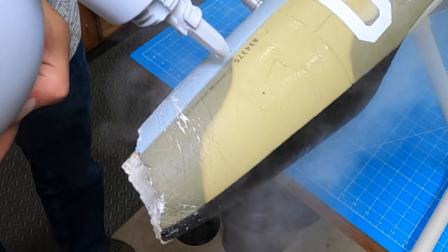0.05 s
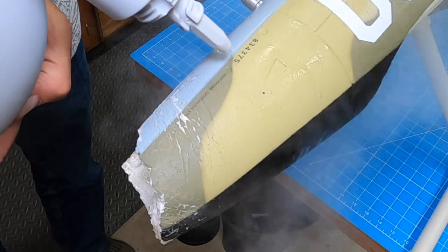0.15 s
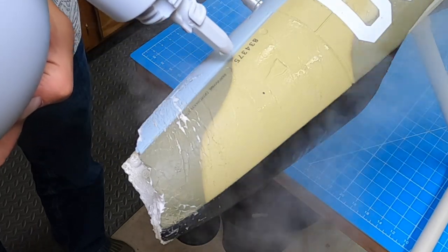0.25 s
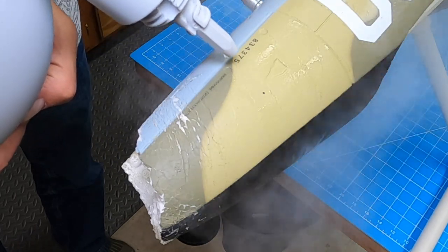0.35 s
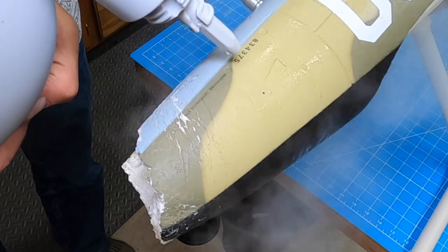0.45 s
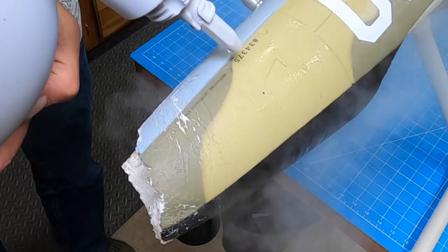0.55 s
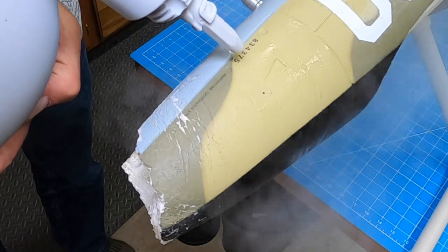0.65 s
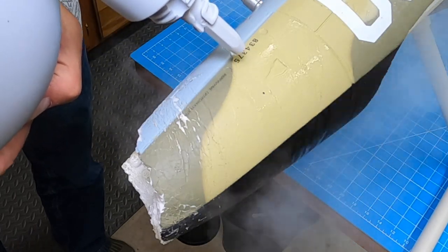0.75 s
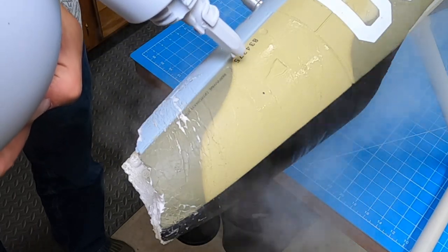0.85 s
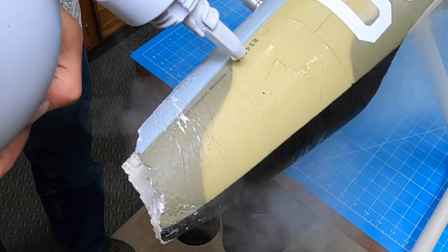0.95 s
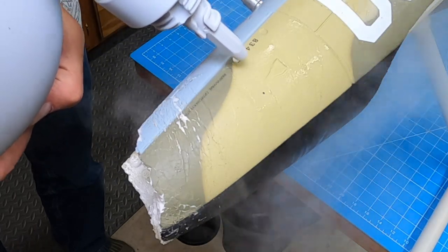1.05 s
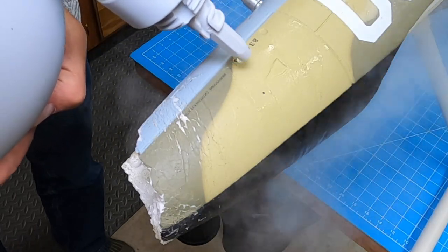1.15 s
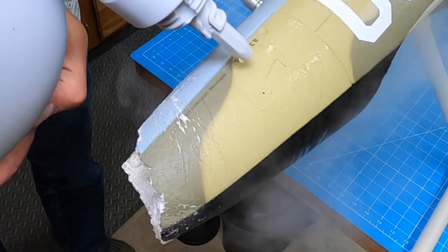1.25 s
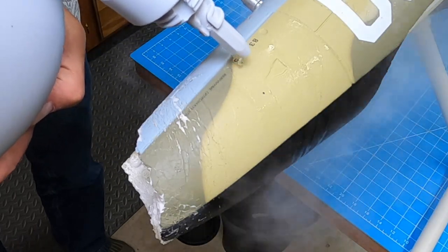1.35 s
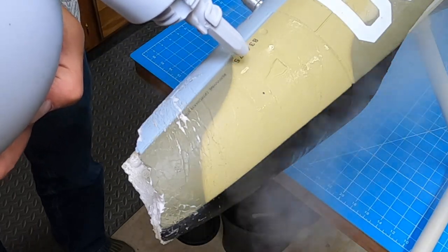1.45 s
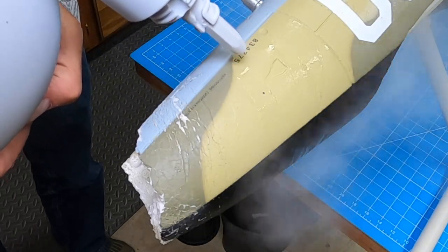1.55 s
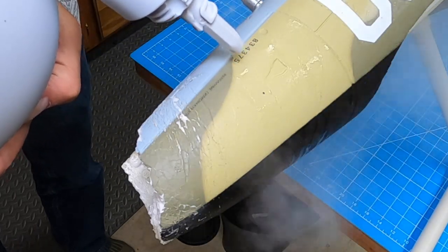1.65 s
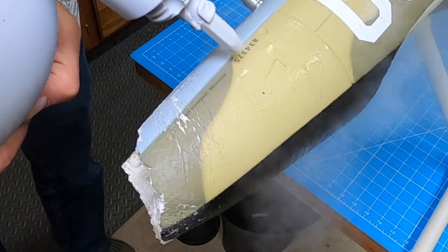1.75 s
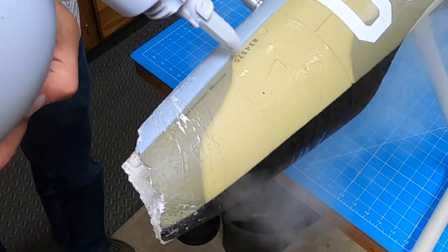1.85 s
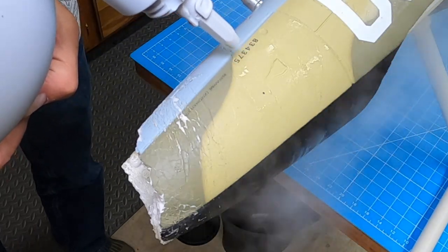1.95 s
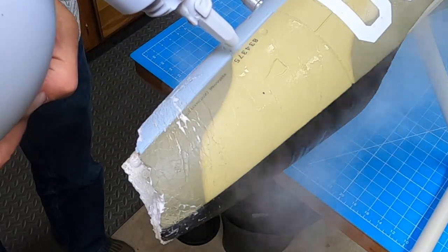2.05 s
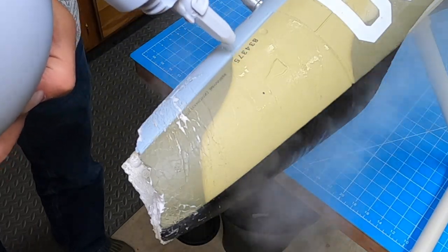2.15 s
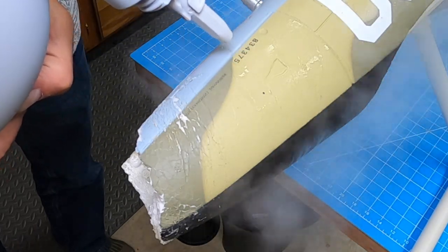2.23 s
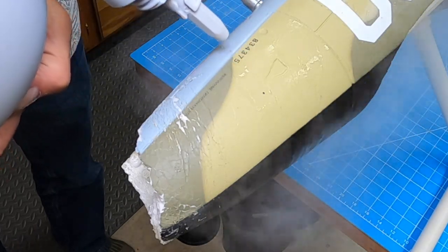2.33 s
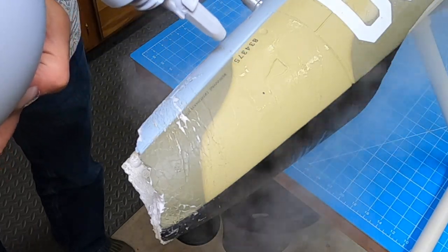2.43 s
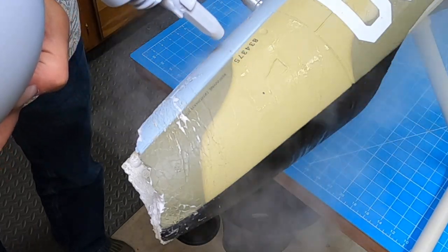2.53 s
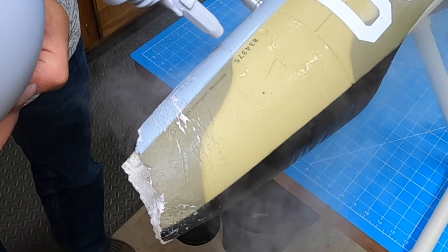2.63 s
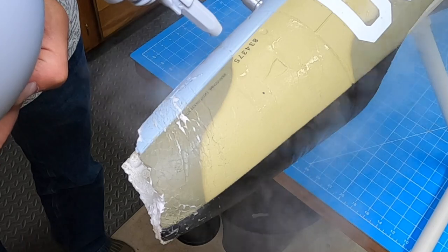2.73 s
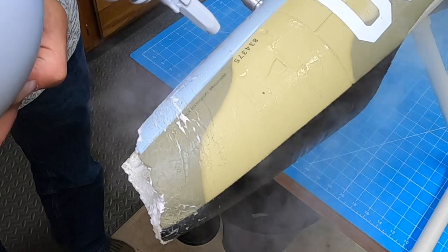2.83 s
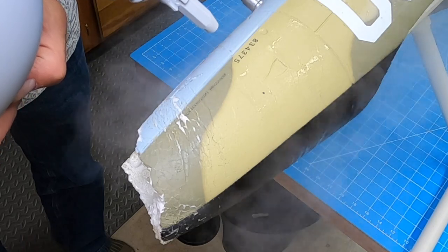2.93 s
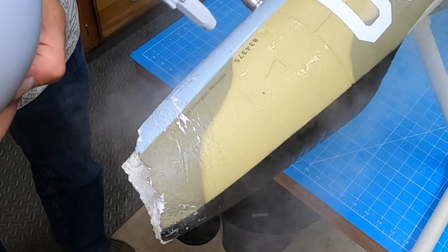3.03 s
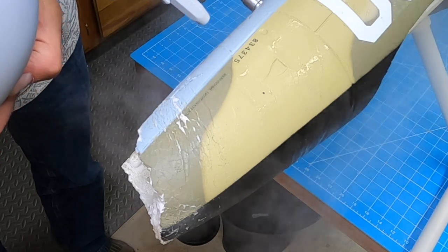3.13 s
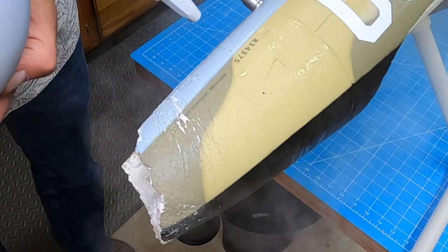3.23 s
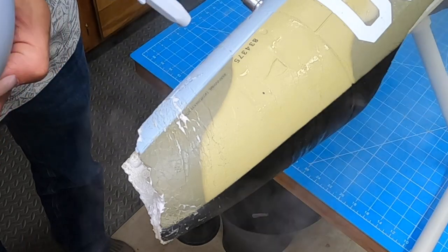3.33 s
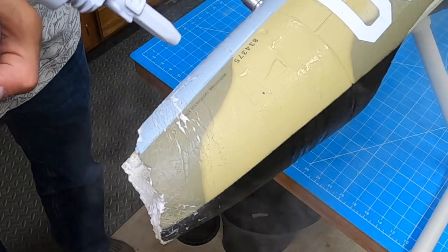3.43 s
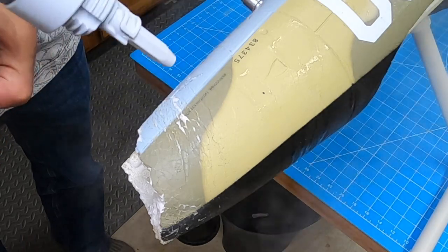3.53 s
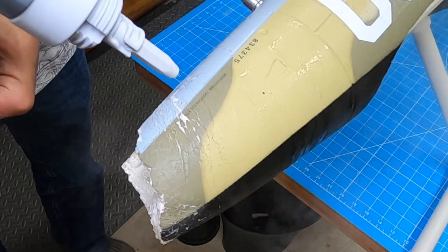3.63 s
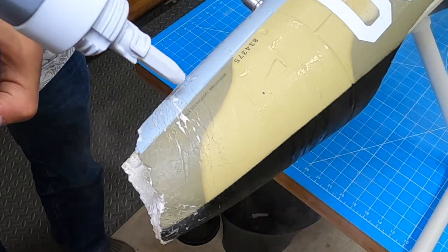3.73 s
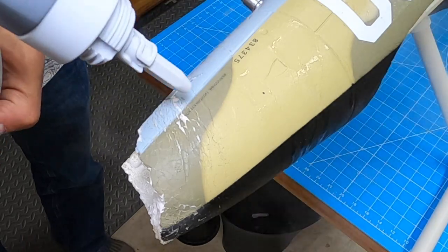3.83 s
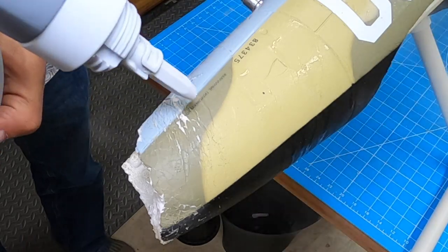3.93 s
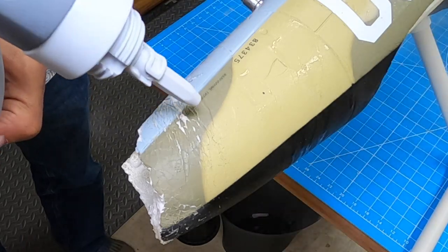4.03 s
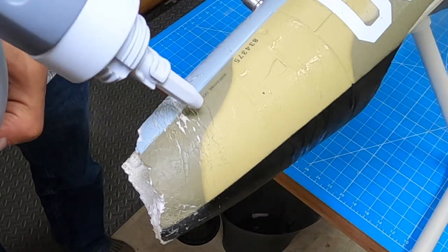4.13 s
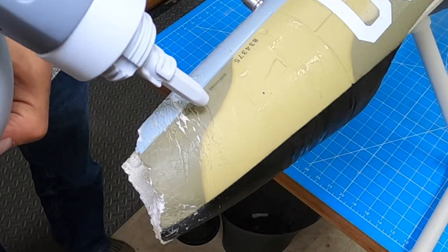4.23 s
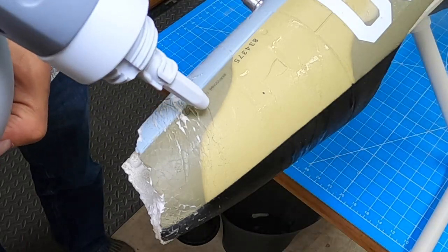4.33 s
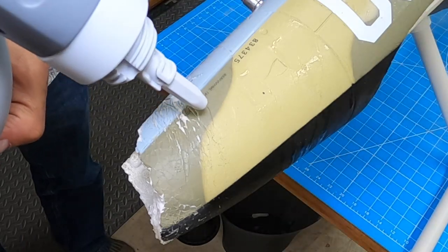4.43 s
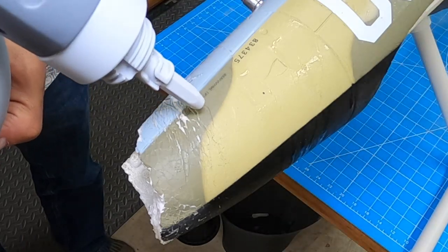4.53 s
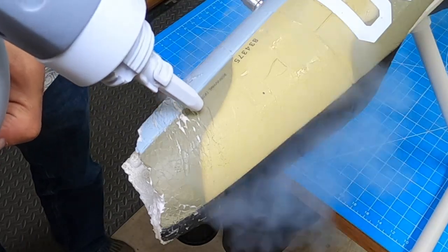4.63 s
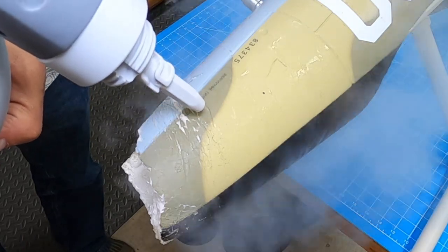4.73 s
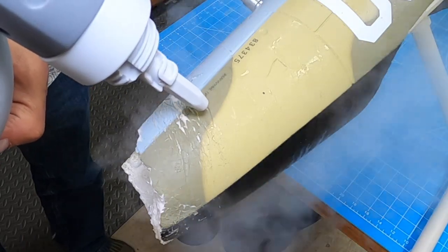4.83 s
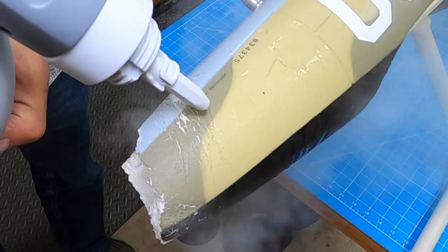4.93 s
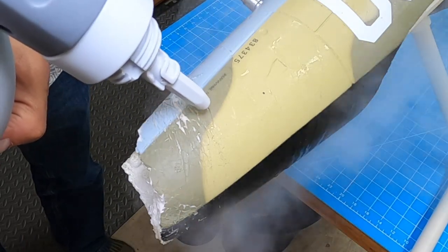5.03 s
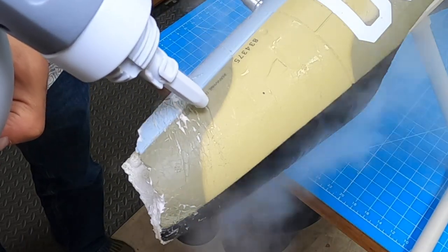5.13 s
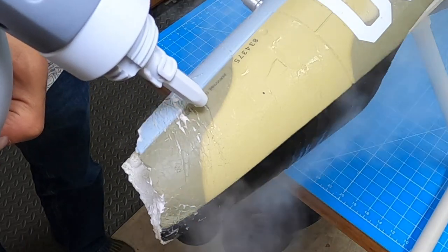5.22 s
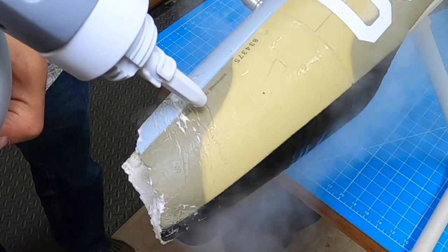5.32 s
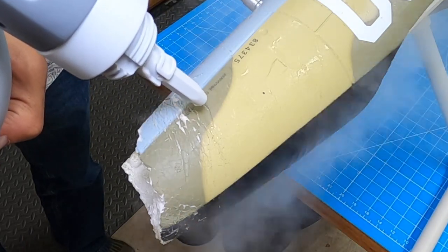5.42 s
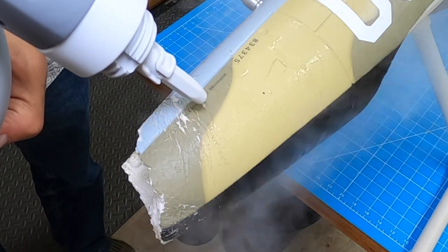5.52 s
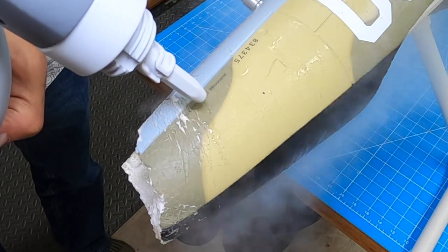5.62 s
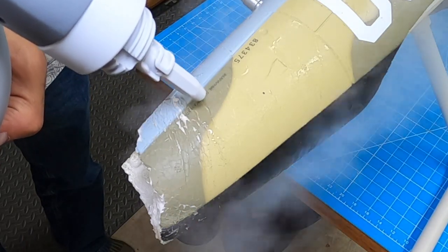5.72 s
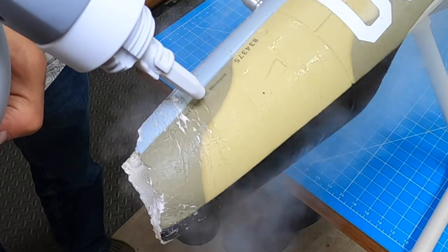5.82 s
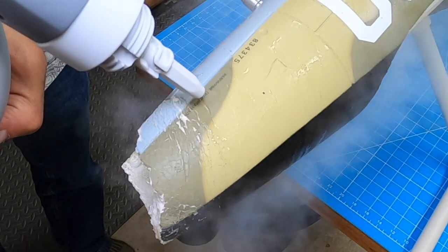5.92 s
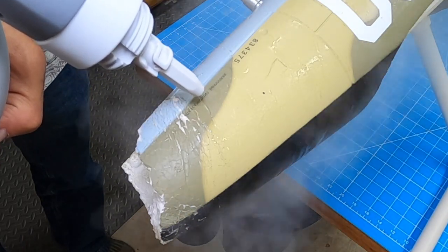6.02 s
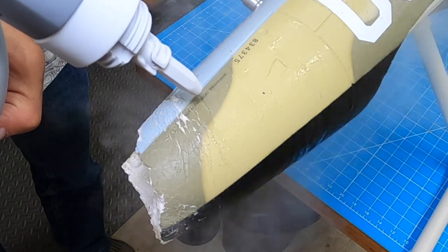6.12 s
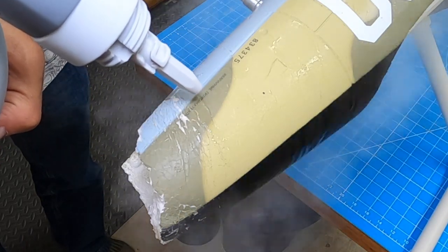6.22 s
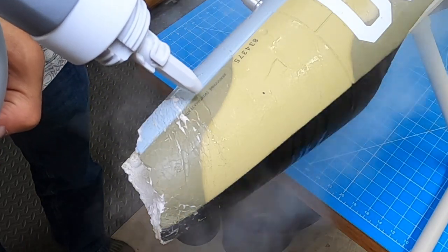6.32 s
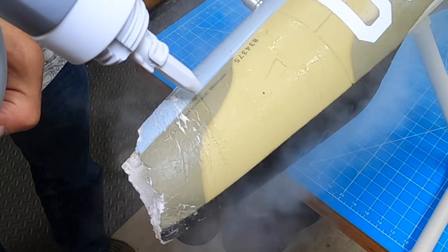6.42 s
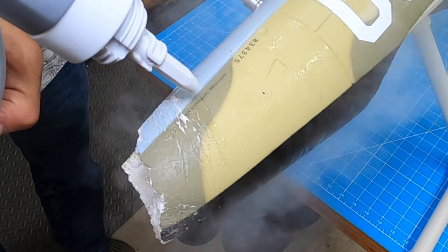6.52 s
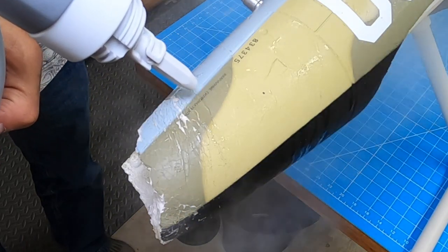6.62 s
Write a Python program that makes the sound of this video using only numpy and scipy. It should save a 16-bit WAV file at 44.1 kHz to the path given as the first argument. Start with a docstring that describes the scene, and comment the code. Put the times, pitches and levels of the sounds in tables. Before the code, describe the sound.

Very close to a stereo microphone in a small workshop, a steamer nozzle blows a loud, steady hiss with watery sputtering underneath and a thin breathy whistle near its end. The jet snaps off, leaving quiet boiler simmer and faint hum. Small plastic trigger ticks and a swelling fizz follow, then a second blast starts hard and settles into a steady hiss until the end.

```python
"""A handheld steamer, close to a small stereo microphone, blows two bursts through a narrow nozzle onto foam.
The jet is filtered noise that follows its valve: smooth hiss above, sputtering slugs of water in the bass,
and at times a breathy whistle. A small workshop answers with a short tail of dense echoes.
In the pause the plastic trigger ticks as struck modes; behind it all a boiler simmers in bands of noise
and two wavering sines are the mains hum."""
import sys
import numpy as np
from scipy import signal
from scipy.fft import rfft, irfft, next_fast_len
from scipy.io import wavfile
from scipy.ndimage import uniform_filter1d

SR = 44100
rng = np.random.default_rng(int(sys.argv[2]) if len(sys.argv) > 2 else 0)


def dump_mix(stems):
    """Bounce the given channels to the path in sys.argv[1] as a 16-bit WAV at rate SR."""
    frames = np.atleast_2d(stems).T  # one column per channel
    limited = np.clip(frames, -1, 1)  # hard clip at full scale
    pcm = np.round(limited * 32767).astype(np.int16)
    wavfile.write(sys.argv[1], SR, pcm)


N = 294147
SIZE = next_fast_len(N)
HZ = np.maximum(np.fft.rfftfreq(SIZE, 1 / SR), 1)
TIME = np.arange(N) / SR


def undb(db):
    """Gain of a level in dB."""
    return 10 ** (np.asarray(db) / 20)


def unit(x):
    """Scale to rms 1."""
    return x / np.sqrt(np.mean(x ** 2))


def left_right(pan_db):
    """Levels in dB of the two microphone ports, left minus right being pan_db."""
    return np.array([[pan_db], [-pan_db]]) / 2


def over_hz(table, hz=HZ):
    """Columns of a table, joined on a log-frequency axis."""
    f, *columns = np.transpose(table)
    return [np.interp(np.log(hz), np.log(f), c) for c in columns]


def over_time(table):
    """Columns of a table, joined in time."""
    s, *columns = np.transpose(table)
    return [np.interp(TIME, s, c) for c in columns]


def smooth_twice(x, samples):
    """Two running means in a row: a gentle low-pass."""
    return uniform_filter1d(uniform_filter1d(x, samples), samples)


def walk(rate):
    """Random levels held 1 / rate s and slewed twice; spread 1."""
    hold = int(SR / rate)
    levels = np.repeat(rng.standard_normal(N // hold + 1), hold)
    smooth = smooth_twice(levels, hold)[:N]
    return smooth / np.std(smooth)


def octaves(step):
    """Overlapping bands, step octaves apart, whose gains add up to one: (centre Hz, gain)."""
    for hz in 24 * 2 ** np.arange(0, 10, step):
        away = np.clip(np.log2(HZ / hz) / step, -1, 1)
        yield hz, np.cos(np.pi / 2 * away) ** 2


def colour(spectrum, peaks, core_lo_hz=2800, core_hi_hz=5200):
    """Gain of a spectrum with its peaks and dips; white noise gives rms 1 in the core band."""
    peak_db = sum(lift / (1 + (2 * (HZ - f) / width) ** 2) for f, width, lift in peaks)
    db = over_hz(spectrum)[0] + peak_db
    core = (HZ > core_lo_hz) & (HZ < core_hi_hz)
    return undb(db) / np.sqrt(np.sum(undb(db[core]) ** 2) / len(HZ))


# Boiler at rest, one row a band from rumble to high fizz: rest level/dB, lift just after the jet stops/dB,
# time that lift lingers/s, lift in the swell/dB, exponent on the swell (1 follows it evenly, more comes late)
SIMMER = [(-60, -1.5, .18, 2.5, 1.01), (-70.5, 1.5, .18, 10, .8), (-79, 16, .24, 17, 1.7),
          (-72.5, 7, .1, 7.5, 1.05)]
# Edges of those bands: f/Hz
SIMMER_EDGES_HZ = [0, 750, 1850, 2650, 16000]
# Colour of the boiler within each band: f/Hz, relative level/dB
SIMMER_COLOUR = [(24, -60), (50, -39), (90, -28.5), (150, -14.5), (290, -7.5), (350, -9), (415, -6),
                 (530, -11), (650, -17.5), (830, -21.5), (1100, -12), (1600, -15), (2350, -16.5),
                 (2650, -23.5), (3400, -26), (4000, -20), (4500, -19), (5300, -27), (7500, -37.5),
                 (8500, -44), (13000, -55.5)]
# Peaks and dips in the boiler's noise: f/Hz, width/Hz, lift/dB (below zero for a dip)
SIMMER_PEAKS = [(178, 15, 4), (240, 20, 3), (286, 22, 6), (335, 20, 4), (409, 22, 6), (518, 20, 5),
                (1557, 30, 4), (2350, 200, 3), (3200, 900, -4), (4500, 300, 2)]
# Stereo width of the boiler: f/Hz, share of unrelated side sound
SIMMER_WIDE = [(60, .2), (300, 0.25), (1400, 0.67), (6500, .7), (13000, 0.9)]
# Swell of the fizz around the trigger ticks: t/s, share 0-1
SWELL = [(3.55, 0), (3.75, .22), (3.95, 0.3), (4.04, .45), (4.12, 1), (4.22, .88), (4.29, .95),
         (4.33, 0.65), (4.39, .84), (4.45, 0.72), (4.56, .68)]
# Mains hum: f/Hz, rms level before it wavers/dB
MAINS = [(59.3, -82), (119.7, -79)]
BOILER_PAN_DB = .6  # left minus right


def mains_hum(waver_db=1.6, waver_rate=9):
    """Steady sines at the mains frequencies, each wavering in level."""
    return sum(np.sqrt(2) * undb(db + waver_db * walk(waver_rate)) * np.sin(2 * np.pi * hz * TIME)
               for hz, db in MAINS)


def boiler(bubble_db=1.25, bubble_rate=40):
    """Bubbling noise: a rumble and three faint bands of fizz, wide in the treble, with mains hum."""
    wide = over_hz(SIMMER_WIDE)[0]
    mid, side = rfft(rng.standard_normal((2, N)), SIZE)
    ports = np.array([mid + wide * side, mid - wide * side])
    ports = undb(left_right(BOILER_PAN_DB)) * ports * colour(SIMMER_COLOUR, SIMMER_PEAKS)
    since_shut = np.maximum(TIME - VALVE[4][0], 0)
    swell = over_time(SWELL)[0]
    out = mains_hum()
    for lo, hi, row in zip(SIMMER_EDGES_HZ, SIMMER_EDGES_HZ[1:], SIMMER):
        rest_db, linger_db, linger_s, swell_db, late = row
        db = rest_db + linger_db * np.exp(-since_shut / linger_s) + swell_db * swell ** late
        band_gain = 1 / (1 + (lo / HZ) ** 14) - 1 / (1 + (hi / HZ) ** 14)
        band = irfft(ports * band_gain, SIZE)[:, :N]
        out = out + band / np.std(band.mean(axis=0)) * undb(db + bubble_db * walk(bubble_rate))
    return out


ROOM_T60_S, ROOM_DB, ROOM_LOW_HZ = 0.17, -11, 1400  # decay, echo energy against the direct sound, low cut


def room(x):
    """Dense echoes from bench and walls, thin in the bass, the same at both ports; they comb the hiss finely."""
    t = np.arange(SR // 3) / SR
    tail = rng.standard_normal(len(t)) * undb(-60 * t / ROOM_T60_S) * (t > .002)
    tail = signal.sosfilt(signal.butter(2, ROOM_LOW_HZ, "highpass", fs=SR, output="sos"), tail)
    echo = undb(ROOM_DB) * tail / np.sqrt(np.sum(tail ** 2))
    echo[0] = 1  # direct sound
    return signal.fftconvolve(x, echo[None], axes=1)[:, :N]


# Trigger ticks, before the room: t/s, peak level/dB, brightness/dB, left minus right/dB,
# length of the push/ms, rattle level/dB
TICKS = [(3.907, -45.5, -15, 5, .3, -26), (4.0047, -37.5, -8, 3, .12, -24), (4.0072, -43, -12, 3, .7, -20),
         (4.068, -39.5, -6, 4, .15, -20), (4.089, -34.5, -5, 4, .17, -20), (4.096, -44, -8, 4, .3, -16),
         (4.356, -53, 4, 4, .12, -18)]
# Modes of the plastic trigger: f/Hz, level/dB, t60/s
TRIGGER = [(960, -2, 0.014), (1250, -1, .007), (1620, 2, 0.008), (2150, -5, .006), (2900, -1, .006),
           (3700, -3, .005), (4800, -1, .006), (5500, -5, 0.005), (6600, -4, .006), (8000, -14, .004)]


def trigger(rattle_t60_s=.075, low_hz=550):
    """Each tick rings the short plastic modes and rattles on; bright ticks ring the high modes more."""
    out, t = np.zeros((2, N)), np.arange(SR // 8) / SR
    thin = signal.butter(2, low_hz, "highpass", fs=SR, output="sos")  # a small part radiates no bass
    chance = rng.standard_normal((len(TICKS), len(t)))
    for (s, db, bright_db, pan_db, push_ms, rattle_db), noise in zip(TICKS, chance):
        rattle = undb(rattle_db - 60 * t / rattle_t60_s) * noise
        blow = np.sin(np.pi * np.clip(t * 1000 / push_ms, 0, 1)) ** 2
        push = rattle + 2 * blow / blow.sum()
        body = np.zeros(len(t))
        for k, (hz, mode_db, t60) in enumerate(TRIGGER):
            level_db = mode_db + bright_db * (hz > 2500) - 60 * t / t60
            body += (-1) ** k * undb(level_db) * np.sin(2 * np.pi * hz * t)
        tick = signal.sosfilt(thin, signal.fftconvolve(push, body)[:len(t)])
        i = int(s * SR)
        out[:, i:i + len(t)] += tick / np.abs(tick).max() * undb(db + left_right(pan_db))
    return out


# Nozzle edge whistling as it lifts off the foam, and again in the first blast of the second burst:
# t/s, f/Hz, level against the hiss/dB, width/Hz
WHISTLE = [(0, 4050, -18, 70), (1.1, 4060, -15, 70), (1.4, 4082, -20, 70), (1.8, 4082, -16, 70),
           (2.3, 3990, -13, 70), (2.5, 3960, -11, 70), (2.67, 4060, -6, 70), (2.8, 4070, -10, 70),
           (2.97, 4090, -6, 70), (3.15, 4120, -10, 70), (4.64, 3800, -10, 700), (4.73, 3700, -6, 700),
           (4.8, 3700, -16, 700), (5.0, 3700, -30, 700)]


def whistle():
    """A breathy tone: a sine whose size and phase are low-passed noise, narrow or wide."""
    hz, db, width_hz = over_time(WHISTLE)
    chance = rng.standard_normal((2, N))
    narrow, wide = (smooth_twice(chance, int(SR / w / 2)) for w in (width_hz.min(), width_hz.max()))
    size = np.where(width_hz < width_hz.max() / 2, unit(narrow), unit(wide))
    turn = 2 * np.pi * np.cumsum(hz) / SR
    return undb(db) * (size[0] * np.cos(turn) + size[1] * np.sin(turn))


# Typed ups and downs of the bass noise level: t/s, lift/dB (below zero for a dip)
BASS_SWINGS = [(.025, 4), (.314, 5), (.369, 3), (.444, 5), (.644, 4), (.69, -6), (.738, 4), (.823, -4),
               (.873, 3), (.943, 4), (1.073, -3), (1.187, 6), (1.255, -3), (1.342, 4), (1.427, -4),
               (1.497, 4), (1.621, 5), (1.696, -4), (1.811, 6), (1.881, 5), (1.956, 4), (2.09, 4),
               (2.205, 4), (2.385, 4), (2.549, -3), (2.619, 7), (2.784, 6), (2.868, 5), (3.048, 5),
               (3.093, 3), (4.769, 4), (4.85, -4), (4.889, 4), (4.93, -3), (5.009, -4), (5.034, 5),
               (5.073, -3), (5.1, 6), (5.148, -5), (5.212, 4), (5.273, -4), (5.31, 3), (5.43, -5),
               (5.49, 4), (5.6, 3), (5.652, -4), (5.682, 3), (5.797, 4), (5.882, -4), (5.91, 3), (5.986, 4),
               (6.01, -3), (6.05, -5), (6.085, 4), (6.136, 4), (6.18, -6), (6.231, 4), (6.305, -7),
               (6.351, 4), (6.4, -4), (6.47, 5), (6.55, -4), (6.58, 4), (6.63, -5)]
SWING_S, RECOIL_S, RECOIL_SHARE = 0.015, 0.045, .3  # half width of a bump, of its recoil, depth of the recoil
DIP_STRETCH = 1.35  # a dip lasts longer than a rise
SWING_TOP_DB = 7.5  # the bass swells no further than this


def bass_swings(wander_db=1.05, wander_rate=42):
    """Bass level in dB: each rise or dip is a short bump with a recoil around it, over chance wandering."""
    db = wander_db * walk(wander_rate)
    for at, lift in BASS_SWINGS:
        near = slice(int((at - 4 * RECOIL_S) * SR), int((at + 4 * RECOIL_S) * SR))
        if near.start < 0:  # a swing so near the start is left out
            continue
        away = (TIME[near] - at) / (1 if lift > 0 else DIP_STRETCH)
        bump = (1 + RECOIL_SHARE) * np.exp(-(away / SWING_S) ** 2)
        recoil = RECOIL_SHARE * np.exp(-(away / RECOIL_S) ** 2)
        db[near] += lift * (bump - recoil)
    return np.where(db > 0, SWING_TOP_DB * np.tanh(db / SWING_TOP_DB), db)


def sputter(slug_rate=100, jitter=.25, scatter_db=3, flutter_db=1.4, flutter_rate=55, rush=0.63):
    """Slugs of water pop out of the nozzle in uneven trains over a fluttering rush."""
    gap_chance, size_chance = rng.standard_normal((N // 100, 2)).T
    at = (np.cumsum(np.exp(jitter * gap_chance)) * SR / slug_rate).astype(int)
    inside = at < N
    pops = np.zeros(N)
    pops[at[inside]] = undb(scatter_db * size_chance)[inside]
    # rush is the share of the power that is plain noise
    mix = np.sqrt(1 - rush) * unit(pops - pops.mean()) + np.sqrt(rush) * rng.standard_normal(N)
    return unit(mix * undb(flutter_db * np.tanh(walk(flutter_rate))))


# Jet with the valve open: t/s, hiss level/dB, then bass, body, edge and treble level/dB,
# these four used only as they move about their mean in each burst
JET = [(0.0, -19.6, -17, -4, -7, -24.5), (0.6, -19.6, -17.5, -4.1, -7, -23),
       (1.0, -19.5, -17.5, -4.5, -7, -24), (1.2, -20, -17, -4, -7.5, -22),
       (1.42, -21.9, -16, -2.7, -6.5, -18), (1.7, -21.3, -16, -3, -6.5, -20),
       (1.9, -20.6, -17, -3.3, -7, -21.5), (2.3, -19.6, -17.5, -3.6, -7, -23),
       (2.75, -18.9, -18.5, -5, -6.5, -23.5), (3.12, -19.6, -20, -5.8, -6.5, -22.5),
       (4.68, -16.7, -16, -3.5, -7, -22), (4.72, -15.8, -15.5, -5.5, -7, -21),
       (4.78, -18.3, -15, -3.2, -6.5, -22.7), (5.1, -19.4, -18, -3.5, -6, -23.5),
       (5.45, -19.8, -17, -3, -6.3, -23.5), (5.8, -20, -17, -3, -7.2, -23.5),
       (6.3, -20, -17.5, -3.5, -7, -22), (6.67, -20.2, -18.5, -3.3, -7.5, -24.5)]
# Valve, snapping shut, then cracking open with a thin hiss before the full stroke:
# t/s, opening level/dB, opening level for bass and body/dB
VALVE = [(3.15, -2, -2), (3.165, -10, -10), (3.18, -22, -22), (3.215, -36, -36), (3.26, -53, -53),
         (4.57, -70, -70), (4.586, -30, -43), (4.612, -15, -33), (4.633, -13.5, -17), (4.645, -5, -6),
         (4.654, -3.5, -2.5), (4.675, 0, 0)]
# How much faster than the core each pitch dies as the valve narrows: f/Hz, closing factor, opening factor
THROTTLE = [(300, 1.07, 1.05), (1500, 0.96, 0.98), (2610, 1.02, 1.75), (3600, 0.9, 1.6), (5200, 1.04, 0.88),
            (8000, 0.94, 1.4), (12050, 0.95, 1.3)]
# Colour of each burst, the nozzle aimed differently: f/Hz, relative level per Hz/dB
FIRST_COLOUR = [(24, -69), (40, -41), (85, -33.5), (160, -20), (302, -15), (333, -15), (387, -19),
                (507, -17.5), (665, -11), (1010, -13), (2340, -2), (3140, -3), (4020, -1.5), (7450, -14),
                (8430, -23.5), (12200, -29.5), (14500, -53)]
SECOND_COLOUR = [(24, -69), (40, -44), (102, -25), (160, -18.5), (333, -14.5), (377, -16), (437, -14),
                 (830, -12), (1660, -7.5), (2230, -0.5), (3920, -1.5), (5150, -4), (7450, -14.5),
                 (8430, -21.5), (12200, -31), (14500, -59)]
# Narrow and broader peaks and dips in the hiss of each burst, partly from room reflections:
# f/Hz, width/Hz, lift/dB (below zero for a dip)
FIRST_PEAKS = [(338, 30, 5.5), (755, 20, 3), (835, 60, -3), (915, 16, 8.5), (1015, 50, -2), (1063, 15, 7.5),
               (1145, 25, 3), (1220, 250, 2), (2405, 35, 2), (2800, 300, 1), (4050, 500, 1.5),
               (4600, 300, 1.2), (5800, 500, 3.5), (7350, 450, 3.5), (11300, 200, 2)]
SECOND_PEAKS = [(337, 22, 4), (916, 14, 7), (1063, 15, 4), (4000, 280, 1.2), (5200, 330, 3.3),
                (5930, 320, 2.8), (6270, 220, -4.5), (6520, 200, 2.5), (7350, 350, 3), (11500, 150, 4)]
# Two close microphone ports: f/Hz, share of the middle leaning left, unrelated side level against the middle/dB
PORTS = [(60, .04, -14.5), (400, .07, -17), (700, .13, -16), (1302, 0.078, -25.5), (2500, 0.16, -23.5),
         (5000, .11, -32), (7430, 0.11, -15.5), (9300, .4, -1), (10500, .5, 3), (12520, .5, 4.5),
         (14500, .9, 20)]
WHISTLE_THROTTLE, WHISTLE_PAN_DB = 1.3, 2.2  # dies faster than the hiss; left minus right
SWING_BODY_SHARE = .15  # share of the bass swings that reaches the body of the hiss
SWING_DEEP_SHARE, DEEP_HZ = .4, 220  # the deepest bass swings further by this share


def jet_ports(sputter_top_hz=850):
    """Spectra at the two ports: sputter below, smooth hiss above, leaning left with unrelated side sound."""
    low = 1 / (1 + (HZ / sputter_top_hz) ** 2.9)
    hiss = rfft(rng.standard_normal(N), SIZE)
    mid = rfft(sputter(), SIZE) * np.sqrt(low) + hiss * np.sqrt(1 - low)
    lean, apart_db = over_hz(PORTS)
    side = lean * mid + undb(apart_db) * rfft(rng.standard_normal(N), SIZE)
    return np.array([mid + side, mid - side])


def jet(surge_db=0.36, flicker_db=0.32):
    """Steam noise with a whistle; every band follows valve and aim, and flickers a little."""
    hiss_db, bass_db, body_db, edge_db, treble_db = over_time(JET)
    valve_db, low_valve_db = over_time(VALVE)
    swing_db = bass_swings()
    first = TIME < (VALVE[4][0] + VALVE[5][0]) / 2  # the first burst, up to mid-pause
    ports = jet_ports()
    tints = colour(FIRST_COLOUR, FIRST_PEAKS), colour(SECOND_COLOUR, SECOND_PEAKS)
    # the spectra hold the mean colour of a burst, the curves move it about that mean
    before, after = TIME < VALVE[0][0], TIME > VALVE[-1][0]
    curves = (bass_db + swing_db, body_db + SWING_BODY_SHARE * swing_db, np.zeros(N), edge_db, treble_db)
    aims = [db - np.where(first, db[before].mean(), db[after].mean()) for db in curves]
    out = whistle() * undb(hiss_db + WHISTLE_THROTTLE * valve_db + left_right(WHISTLE_PAN_DB))
    surge = walk(12)
    for hz, band in octaves(.5):
        bursts = (irfft(ports * band * tint, SIZE)[:, :N] for tint in tints)
        sound = np.where(first, *bursts)
        aim_db = aims[np.searchsorted([1000, 2800, 5500, 9000], hz)]  # bass, body, core, edge, treble
        if hz < DEEP_HZ:
            aim_db = aim_db + SWING_DEEP_SHARE * (swing_db - swing_db.mean())
        throttle = np.where(first, *over_hz(THROTTLE, hz))
        opening_db = throttle * (low_valve_db if hz < 2000 else valve_db)
        restless_db = surge_db * surge + flicker_db * walk(15)
        out = out + sound * undb(hiss_db + aim_db + opening_db + restless_db)
    return out


def scene():
    """Steamer and trigger in the room, over the boiler."""
    return room(jet() + trigger()) + boiler()


TOP_HZ = 14900


def record(dry, ceiling=.95):
    """The stereo recorder rounds off the tallest peaks and cuts the top."""
    rounded = dry / (1 + (np.abs(dry) / ceiling) ** 6) ** (1 / 6)
    return signal.sosfilt(signal.ellip(12, .2, 70, TOP_HZ, fs=SR, output="sos"), rounded)


dry = scene()
out = record(dry)
dump_mix(out)
```